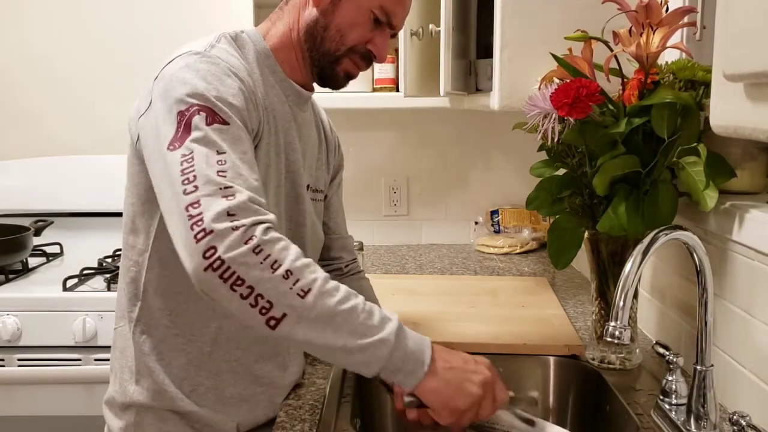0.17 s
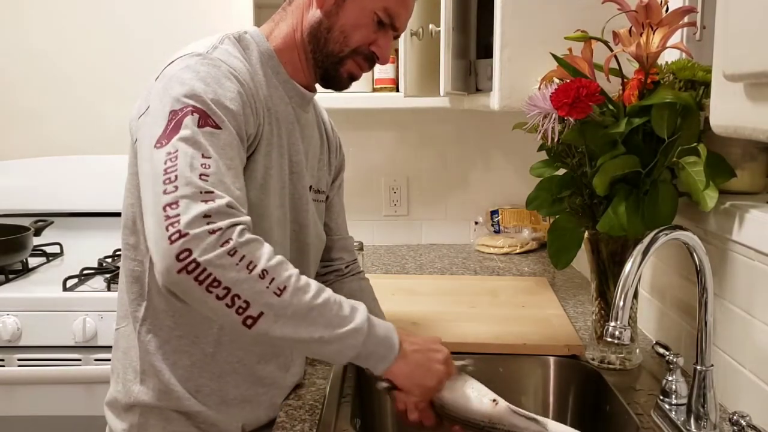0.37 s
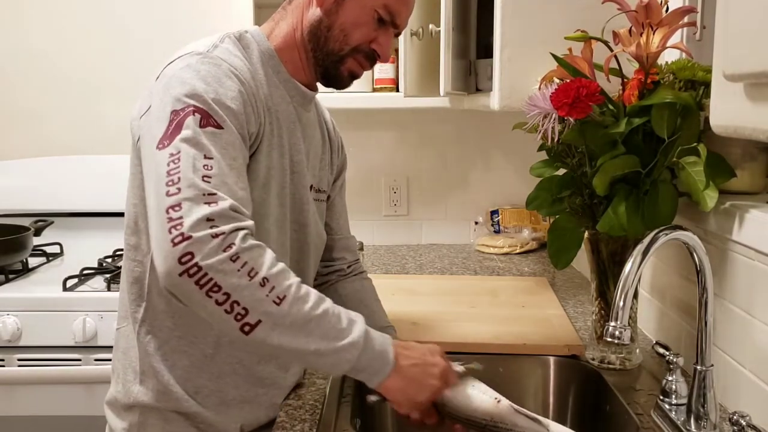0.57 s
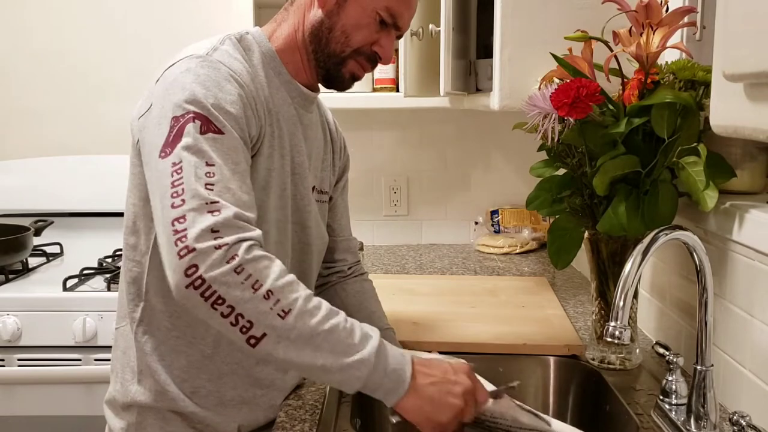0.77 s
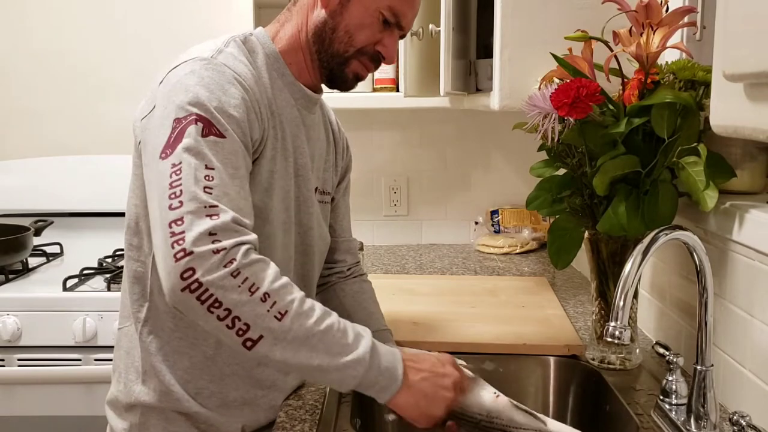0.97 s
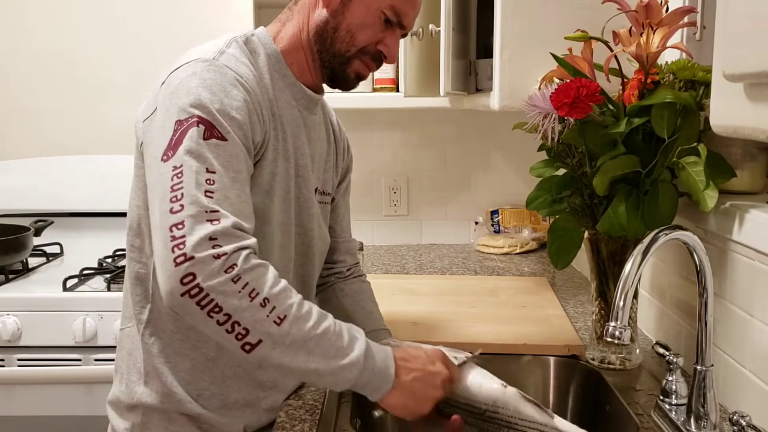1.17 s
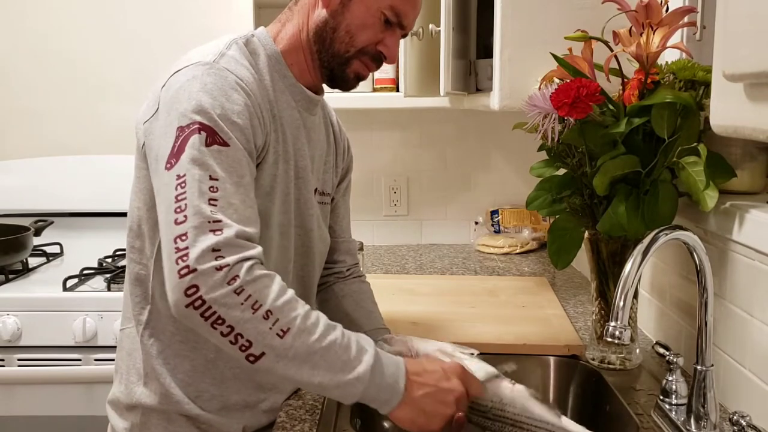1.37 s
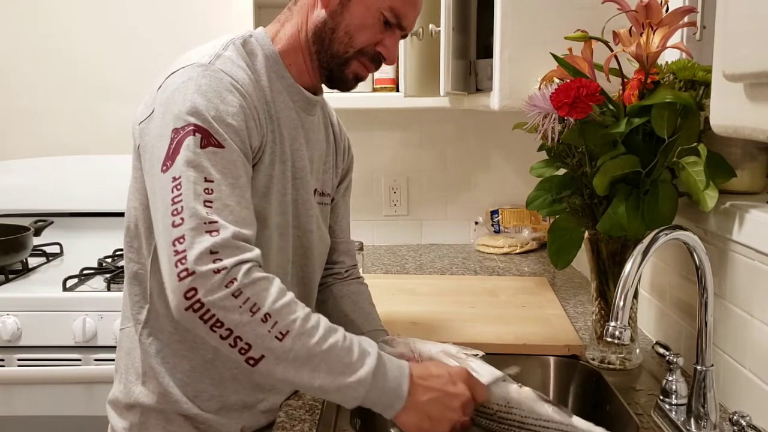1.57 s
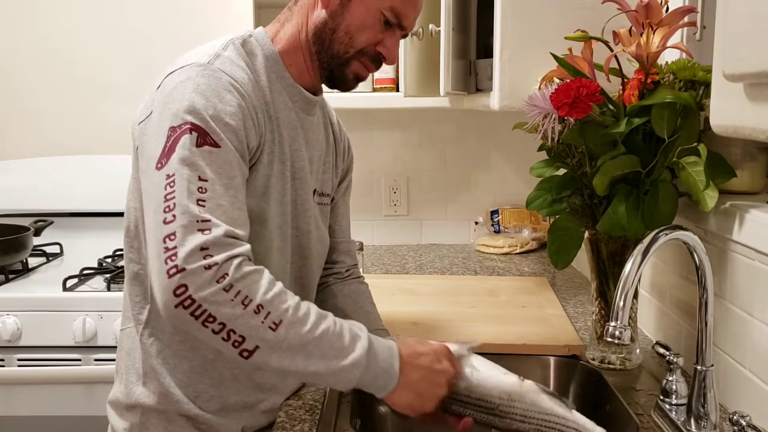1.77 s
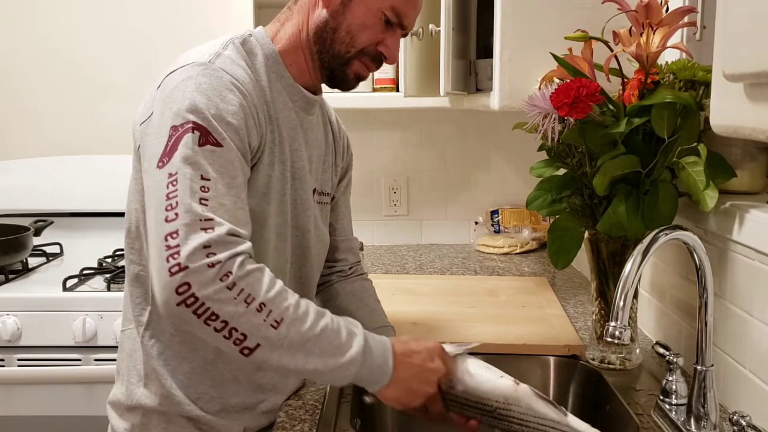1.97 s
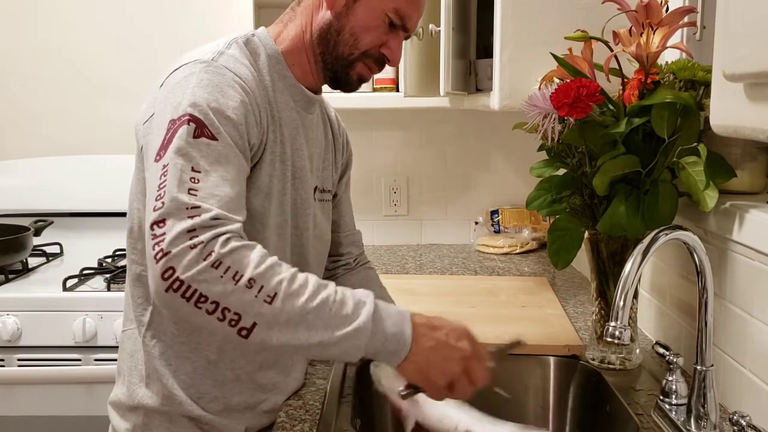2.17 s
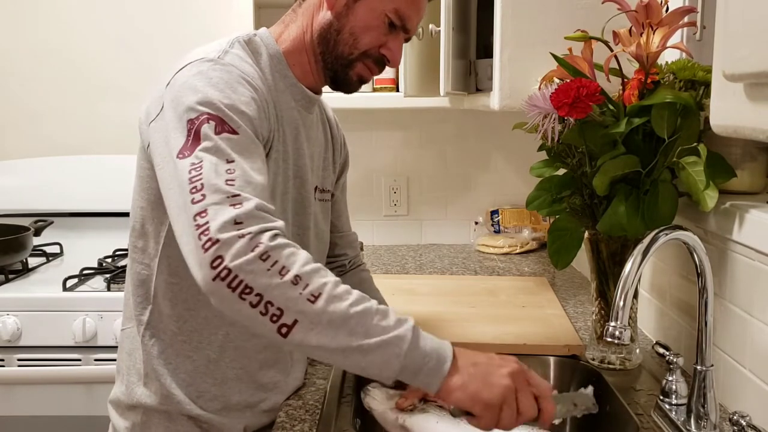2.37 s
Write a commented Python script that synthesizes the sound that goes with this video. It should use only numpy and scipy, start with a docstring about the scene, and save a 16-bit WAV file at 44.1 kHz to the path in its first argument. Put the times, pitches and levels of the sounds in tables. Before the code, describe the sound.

A knife scrapes scales off a fish in seven quick, crackling strokes, with sharp snaps, dull body flutters and tiny blade squeaks. It is heard close to a steel sink in a small kitchen with a faint appliance hum.

```python
"""Scaling a fish at the sink

A stereo pair of microphones close to a steel sink in a small, hard kitchen. A knife makes seven quick
strokes, each a dense crackle of scales flicking off the edge over the dull flutter of the fish's body.
Between strokes the blade slides lightly back; stiff scales snap and the steel squeaks. Sink and room
answer, and a low appliance hum lies behind it all."""
import sys
import numpy as np
from scipy import signal
from scipy.fft import rfft, irfft, next_fast_len
from scipy.io import wavfile
from scipy.ndimage import uniform_filter1d, map_coordinates

SR = 44100
rng = np.random.default_rng(int(sys.argv[2]) if len(sys.argv) > 2 else 0)


def file_out(sig):
    """Save sig as 16-bit WAV at sys.argv[1]."""
    # one column per channel
    cols = np.atleast_2d(sig).T
    # limit, then scale
    lim = np.clip(cols, -1, 1)
    pcm = np.round(lim * 32767).astype(np.int16)
    wavfile.write(sys.argv[1], SR, pcm)


N = 108045

# Tone colour of each layer: frequency_hz, gain_db
AIR_SPECTRUM = [(25, -25.5), (55, -0.5), (105, -3.5), (370, -9.5), (600, -15.5), (1200, -35.5),
                (2200, -41.5), (7800, -35.5), (9200, -39.5)]
BODY_SPECTRUM = [(30, -18.5), (85, -2), (120, -9), (158, 2.5), (195, -2), (240, -2.5), (280, 2),
                 (320, -12.5), (420, -12.5), (900, -31.5)]
SNAP_SPECTRUM = [(400, -34), (5000, -9), (7500, -2.5), (16000, -4)]
CATCH_SPECTRUM = [(2000, -11.5), (3200, -3), (5500, -5), (16000, -26)]
RUB_SPECTRUM = [(250, -15), (700, -1.5), (1150, -0.5), (1700, -12), (2500, -11.5), (3050, -0.5), (5600, -3),
                (7600, -14), (16000, -15)]
RASP_SPECTRUM = [(150, -32.5), (450, 4.5), (1150, 4.5), (2200, -4), (5000, -3), (16000, -26)]
CRACKLE_SPECTRUM = [(300, -23.5), (2300, -14.5), (3000, -6.5), (7400, -2), (9000, -5), (10500, -0.5),
                    (14000, 1), (16000, -2)]
# How alike the two microphones hear the air and the knife: frequency_hz, correlation
AIR_LIKENESS = [(200, 0.98), (600, 0.7), (1500, 0.033)]
KNIFE_LIKENESS = [(280, 0.97), (600, 0.52), (1200, 0), (2200, 0.29), (5000, 0)]
# The knife's lean between the microphones: frequency_hz, left_minus_right_db
KNIFE_BALANCE = [(1300, -0.1), (4200, 1.3), (8000, 0.55)]
# Appliance tones: pitch_hz, level_db
HUM_TONES = [(53.8, -56), (371, -70.5)]
# Decay of the kitchen: frequency_hz, t60_s
ROOM_DECAY = [(150, 0.25), (1000, 0.56), (8000, 0.52), (15000, 0.38)]
# Resonances of the hollow basin and the steel blade: pitch_hz, width_hz, gain_db
BASIN_MODES = [(551, 35.6, 6.5), (724, 45, -6.5)]
BLADE_MODES = [(3326, 51, -6), (4560, 91, -7.5), (7640, 420, -6.5)]
# The edge sings as it skids: start_s, pitch_hz, level_db
SQUEAKS = [(0.206, 4130, -44), (0.218, 3180, -46), (0.557, 3050, -49), (0.718, 3200, -54),
           (0.857, 3050, -44), (1.369, 4780, -41.5)]
# Stiff scales snap off; the edge catches on a row with a duller tick: start_s, level_db
SNAPS = [(.218, -27), (0.32, -28.5), (0.5293, -26.5), (0.5842, -16.5), (0.855, -31), (1.1308, -11),
         (1.1725, -16), (1.3987, -19), (1.942, -22.5), (2.007, -25.5)]
CATCHES = [(.2045, -31.5), (.229, -30.5), (1.131, -28), (1.669, -37), (1.6865, -25.5), (1.724, -31),
           (1.9205, -30)]
# The fading tail of an earlier stroke, then light slides on the wet skin:
# start_s, length_s, rub_db, fizz_db
LIGHT_TOUCHES = [(-.015, 0.018, -74, -59.5), (0.169, 0.045, -55, -47), (0.21, 0.021, -42.5, -42),
                 (0.261, 0.023, -47.5, -46), (0.394, 0.013, -54, -56), (0.525, 0.054, -48.5, -47),
                 (0.708, 0.024, -58, -50), (0.834, 0.049, -52.5, -39.5), (0.96, 0.044, -60, -51.5),
                 (1.056, 0.079, -63, -53), (1.095, 0.06, -50, -36), (1.166, 0.017, -67, -27.5),
                 (1.257, 0.084, -62, -52), (1.364, 0.03, -48, -40), (1.533, 0.064, -57.5, -46.5),
                 (1.638, 0.025, -53, -41), (1.803, 0.18, -67, -48), (2.135, 0.07, -60, -52)]
# Strokes against the scales: start_s, length_s, crackle_db, rasp_db, body_db, body_delay_s, flutter_hz
STROKES = [(0.289, 0.04, -43.5, -50, -38.5, -0.0016, 261), (0.585, 0.032, -42, -46.5, -37.5, -0.0061, 163),
           (0.871, 0.05, -35.5, -49, -42, 0.00052, 274), (1.141, 0.069, -37, -50, -39, -0.026, 158),
           (1.409, 0.051, -34, -50, -35, -0.015, 256), (1.669, 0.063, -33, -54, -36, -0.017, 260),
           (1.922, 0.083, -35.5, -48, -39.5, -0.013, 202)]

AIR_DB, HUM_WAVER_DB = -54, 1.5
DRONE_HZ, DRONE_DB, DRONE_START_S, DRONE_RISE_S = 81, -51.5, 2.05, 0.047
SINK_T60_S, ROOM_DELAY_S = 0.079, 0.0036
WALL_DELAY_S, WALL_DB = 0.0015, -10.5
FLUTTER_WIDTH_HZ, FLUTTER_DB = 33.3, 0.5
SCALES_PER_S, RASPS_PER_S, SLIPS_PER_S, TUGS_PER_S = 2000, 420, 3600, 420


def amp(db):
    """Decibels to amplitude."""
    return 10 ** (np.asarray(db) / 20)


def unit_rms(x):
    """x scaled to an RMS of one."""
    return x / np.sqrt(np.mean(x ** 2) + 1e-20)


def curve_at(points, hz):
    """Interpolate (frequency_hz, value) points on a log frequency axis."""
    frequencies, values = np.transpose(points)
    return np.interp(np.log(hz + 1), np.log(frequencies + 1), values)


def filtered(x, response):
    """x through a zero-phase filter of gain response(hz)."""
    size = next_fast_len(N + SR // 2)
    return irfft(rfft(x, size) * response(np.fft.rfftfreq(size, 1 / SR)), size)[..., :N]


def colour(x, spectrum):
    """x through a causal filter of unit power gain with the given spectrum."""
    size = 2 * next_fast_len(N)
    gain = unit_rms(amp(curve_at(spectrum, np.fft.rfftfreq(size, 1 / SR))))
    cepstrum = irfft(np.log(gain))
    cepstrum[1:size // 2] *= 2  # fold to minimum phase
    cepstrum[size // 2 + 1:] = 0
    return irfft(rfft(x, size) * np.exp(rfft(cepstrum)), size)[..., :N]


def stereo(pair, likeness):
    """Mix two signals as mid and side; unrelated ones come out with the given likeness."""
    angle = lambda hz: np.arccos(np.clip(curve_at(likeness, hz), -1, 1)) / 2
    mid, side = filtered(pair, lambda hz: np.array([np.cos(angle(hz)), np.sin(angle(hz))]))
    return np.array([mid + side, mid - side])


def ringing(x, modes):
    """The answer of (pitch_hz, width_hz, gain_db) resonances to x."""
    return sum(amp(db) * signal.lfilter(*signal.iirpeak(hz, hz / width, SR), x)
               for hz, width, db in modes)


def pressure(start_s, length_s, rise_s, release_s, sag_db_per_s=0):
    """Pressure of the blade: rise, sagging hold, release."""
    t = np.arange(N) / SR - start_s
    live = (t > -rise_s) & (t < length_s + 10 * release_s)
    t, level = t[live], np.zeros(N)
    onset = np.clip(t / rise_s + 1 / 4, 0, 1)
    sag = amp(-sag_db_per_s * (np.clip(t, 0, length_s) - length_s / 2))
    level[live] = onset * sag * np.exp(-np.maximum(t - length_s, 0) / release_s)
    return level


def impulses(per_s, spread_db, count=12000):
    """Unevenly spaced impulses of scattered size and sign."""
    at = ((np.arange(count) + 2 * rng.random(count)) * SR / per_s).astype(int)
    sizes = amp(spread_db * np.clip(rng.standard_normal(count), -2, 2)) * rng.choice([-1, 1], count)
    return unit_rms(np.bincount(at[at < N], sizes[at < N], N))


def clicks(per_s, shape_count=12, decay_s=0.00026):
    """A stream of tiny clicks of several shapes, reaching each microphone differently."""
    t = np.arange(SR // 200) / SR
    shapes = rng.standard_normal((shape_count, 2, len(t))) * np.exp(-t / decay_s)
    shapes /= np.linalg.norm(shapes, axis=2, keepdims=True)
    stream = 0
    for shape in shapes:
        hits = impulses(per_s / shape_count, spread_db=3.2)
        stream += signal.oaconvolve(hits[None], shape, axes=1)[:, :N]
    return unit_rms(stream)


def room_tone():
    """Kitchen air, a wavering appliance hum in the centre, and a low drone that sets in near the end."""
    t = np.arange(N) / SR
    waver = lambda per_s: map_coordinates(rng.standard_normal(64), [t * per_s], mode="mirror")
    hum = sum(amp(db + HUM_WAVER_DB * waver(5.88)) * np.sin(2 * np.pi * hz * t + 1.08 * waver(6.8))
              for hz, db in HUM_TONES)
    fade_in = np.clip((t - DRONE_START_S) / DRONE_RISE_S, 0, 1)
    drone = amp(DRONE_DB) * fade_in * np.sin(2 * np.pi * DRONE_HZ * t)
    air = stereo(colour(rng.standard_normal((2, N)), AIR_SPECTRUM), AIR_LIKENESS)
    return amp(AIR_DB) * air + np.sqrt(2) * (hum + drone)


def kitchen(x, sink_db, room_db, block=8192):
    """Direct sound, quick sink echoes and the room's tail, new each block as the hand moves."""
    out = np.zeros((2, N + 3 * block))
    t = np.arange(2 * block) / SR
    for at in range(0, N, block):
        hz, age_s, noise = signal.stft(rng.standard_normal((2, len(t))), SR, nperseg=256)
        decay = amp(-60 * age_s / curve_at(ROOM_DECAY, hz)[:, None])
        tail = signal.istft(noise * decay, SR, nperseg=256)[1]
        tail *= np.clip(t / ROOM_DELAY_S - 1, 0, 1)
        sink = rng.standard_normal(tail.shape) * amp(-60 * t / SINK_T60_S)
        response = (amp(sink_db) * unit_rms(sink) + amp(room_db) * unit_rms(tail)) / np.sqrt(len(t))
        response[:, 0] += 1  # direct sound at the microphones
        wet = signal.fftconvolve(x[:, at:at + block], response / np.linalg.norm(response[0]), axes=1)
        out[:, at:at + wet.shape[1]] += wet
    return out[:, :N]


def fish_body():
    """Tugs at rows of scales make the soft body flutter, pitched by the grip, and the basin knock."""
    tugs = np.array([impulses(TUGS_PER_S, spread_db=-0.5) for _ in range(2)])
    shake = colour(tugs, BODY_SPECTRUM)
    knock = ringing(tugs, BASIN_MODES)
    out = 0
    for start, length, _, _, body_db, delay, flutter_hz in STROKES:
        flutter = shake + ringing(shake, [(flutter_hz, FLUTTER_WIDTH_HZ, FLUTTER_DB)])
        running_rms = np.sqrt(np.abs(uniform_filter1d(flutter ** 2, size=1400, axis=1)) + 1e-6)
        press = pressure(start + delay, length, rise_s=0.016, release_s=0.025, sag_db_per_s=20)
        out += amp(body_db) * press * (flutter / running_rms + knock)
    return kitchen(out, sink_db=-15.5, room_db=-4.5)


def blade_squeaks(width_hz=150):
    """In each skid, tiny slips excite one narrow resonance of the blade."""
    slips, out = clicks(SLIPS_PER_S), 0
    for start, hz, db in SQUEAKS:
        skid = pressure(start, length_s=0.013, rise_s=0.011, release_s=0.009)
        out += amp(db) * skid * unit_rms(ringing(slips, [(hz, width_hz, 0)]))
    return out


def cracks(events, spectrum):
    """A scale gives way all at once: a millisecond burst that bounces off the nearest sink wall."""
    burst = lambda start: pressure(start, length_s=0.0003, rise_s=0.00027, release_s=0.0011)
    level = sum(amp(db) * np.hypot(burst(start), amp(WALL_DB) * burst(start + WALL_DELAY_S))
                for start, db in events)
    return colour(level * rng.choice([-1, 1], (2, N)), spectrum)


def scale_snaps(draws=3):
    """Bright snaps and duller catches ring the blade, sink and room."""
    out = 0
    for _ in range(draws):  # several random draws are averaged for an even tone
        crack = cracks(SNAPS, SNAP_SPECTRUM) + cracks(CATCHES, CATCH_SPECTRUM)
        out += kitchen(crack + ringing(crack, BLADE_MODES), sink_db=2.5, room_db=2.5)
    return out / np.sqrt(draws)


def scraping():
    """Strokes flick off scales and rasp on the skin; light touches rub and fizz. All ring the blade."""
    crackle = rasp = rub = 0
    for start, length, crackle_db, rasp_db, *_ in STROKES:
        press = pressure(start, length, rise_s=0.0039, release_s=0.02, sag_db_per_s=29)
        crackle += amp(crackle_db) * press
        rasp += amp(rasp_db) * press
    for start, length, rub_db, fizz_db in LIGHT_TOUCHES:
        touch = pressure(start, length, rise_s=0.022, release_s=0.018)
        rub += amp(rub_db) * touch
        crackle = np.hypot(crackle, amp(fizz_db) * touch)
    scrape = (colour(crackle * clicks(SCALES_PER_S), CRACKLE_SPECTRUM)
              + colour(rasp * clicks(RASPS_PER_S), RASP_SPECTRUM)
              + colour(rub * clicks(SLIPS_PER_S), RUB_SPECTRUM))
    return scrape + ringing(scrape, BLADE_MODES)


def scene():
    """Knife and fish up close, their treble a little to the left, with the room tone behind."""
    blade = kitchen(scraping() + blade_squeaks(), sink_db=0, room_db=-3.5)
    foreground = stereo(blade + scale_snaps() + fish_body(), KNIFE_LIKENESS)
    balance = lambda hz: amp(np.outer([1, -1], curve_at(KNIFE_BALANCE, hz)) / 2)
    return filtered(foreground, balance) + room_tone()


def record(dry):
    """The recorder keeps nothing above its band limit."""
    return filtered(dry, lambda hz: hz < 15850)


dry = scene()
out = record(dry)
file_out(out)
```